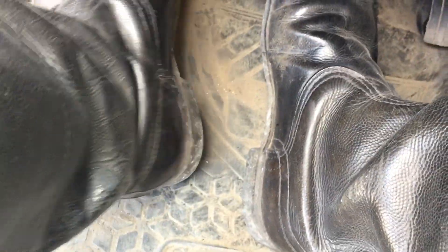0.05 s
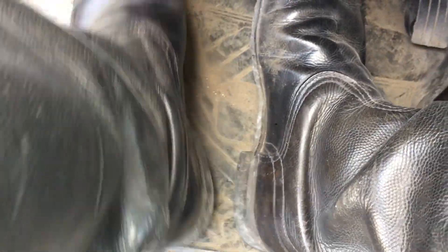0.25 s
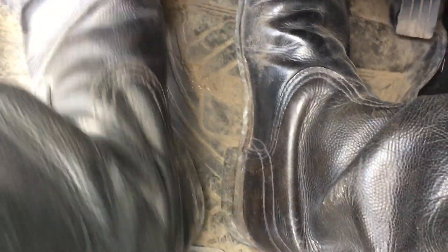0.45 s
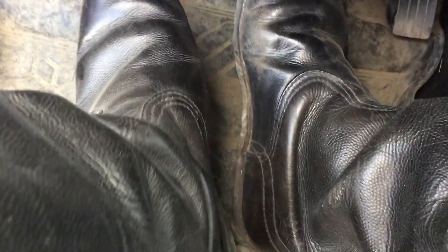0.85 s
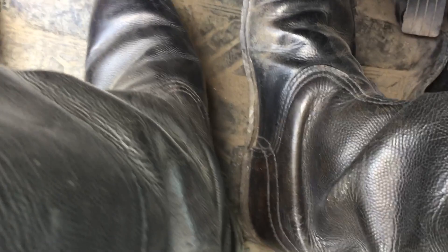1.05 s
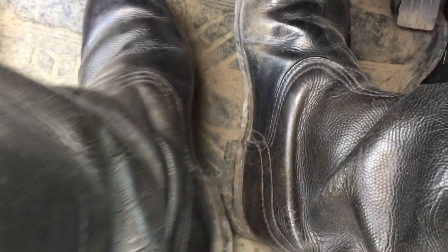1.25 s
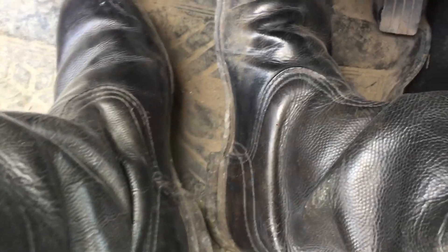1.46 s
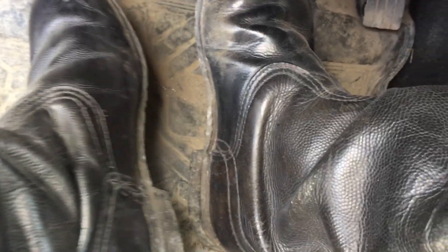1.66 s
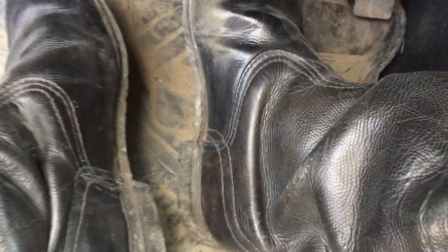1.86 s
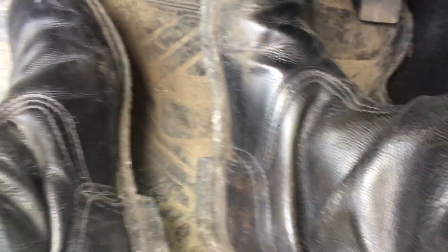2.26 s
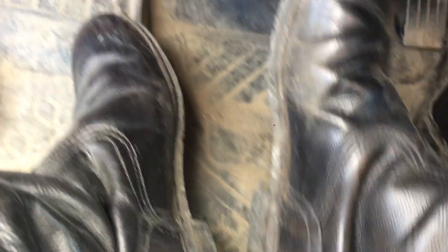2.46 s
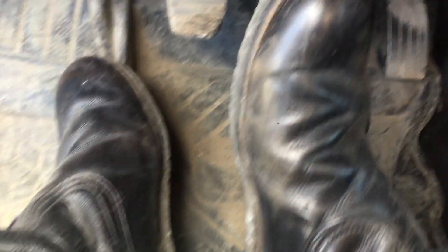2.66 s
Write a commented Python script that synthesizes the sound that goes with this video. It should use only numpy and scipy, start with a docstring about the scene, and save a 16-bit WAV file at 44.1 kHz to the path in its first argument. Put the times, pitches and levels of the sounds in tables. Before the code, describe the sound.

Leather boots shift on a gritty rubber floor mat inside a vehicle, heard up close. The soles scuff and knock over a low rumble, then the leather creaks in short bursts, ending with a click and a soft thump.

```python
"""Inside a vehicle, close to leather boots shifting on a gritty rubber floor mat.
The floor rumbles under the feet; the soles scuff, knock, rasp on the mat's ribs and judder as they grip.
Between scuffs the leather flexes and creaks in short separate slips, ending in one sharper click.
It also shakes a small metal part and chirps twice. The last step leaves a floor panel droning.
Two thin, high whistles sound among the creaks; one brief, very high, hissy tick comes near the end."""
import sys
import numpy as np
from scipy import signal
from scipy.fft import rfft, irfft, next_fast_len
from scipy.io import wavfile
from scipy.ndimage import uniform_filter1d

SR = 44100
rng = np.random.default_rng(int(sys.argv[2]) if len(sys.argv) > 2 else 0)


def digitize_waveform(pressure):
    """Quantize a signal to 16-bit integers and store it at the path in sys.argv[1].

    Rows of a 2-D input are taken as channels; values are limited to [-1, 1].
    """
    field = np.atleast_2d(pressure).T
    bounded = np.clip(field, -1, 1)
    quanta = np.round(bounded * 32767).astype(np.int16)
    wavfile.write(sys.argv[1], SR, quanta)


N = 123479
TIME_S = np.arange(N) / SR

# Spectra of cabin air, floor rumble, rubber rub and dust hiss.
# Each row: frequency in Hz, relative density in dB.
AIR_SPECTRUM = [(20, 0), (85, -8.5), (324, -7.5), (450, -11.5), (900, -20.5), (1500, -18.5),
                (1920, -22), (4300, -25), (10000, -34), (15500, -38)]
RUMBLE_SPECTRUM = [(20, -38.5), (35, -14), (50, 3), (68, 0), (125, -3.5), (170, -12), (300, -18.5),
                   (500, -34.5), (2500, -56)]
RUB_SPECTRUM = [(100, -8), (200, -1.5), (370, -4.5), (480, -14), (700, -11.5), (1000, -24), (1500, -20.5),
                (3000, -43)]
HISS_SPECTRUM = [(2000, -46), (4500, -3), (6200, -6), (7400, -7), (9000, 3), (10400, -4.5), (12000, -4.5),
                 (16000, -6.5)]
# Floor rumble envelope. Each row: time in seconds, level in dB.
RUMBLE_ENVELOPE = [(0, -36), (.03, -55.5), (.12, -64), (.18, -47.5), (.31, -35.5), (.39, -41), (.47, -54),
                   (.56, -60.5), (.66, -48.5), (.82, -46.5), (.89, -54), (.96, -46.5), (1.04, -49),
                   (1.13, -45.5), (1.32, -42), (1.38, -58), (1.47, -71), (1.52, -45.5), (1.6, -51),
                   (1.64, -60), (1.69, -48.5), (2.0, -48), (2.15, -49), (2.2, -57.5), (2.32, -40.5),
                   (2.55, -49.5), (2.8, -52)]
# Sole scuffs. Each row: peak time, rise and fall in seconds, then rub, grit and hiss levels in dB.
SOLE_SCUFFS = [(.139, 0.03, 0.043, -65, -60, -78), (0.17, 0.003, 0.02, -52.5, -59.5, -82),
               (0.328, 0.12, 0.15, -40.5, -46, -47.5), (.395, 0.035, 0.037, -47.5, -56.5, -75),
               (.519, 0.035, 0.014, -51, -51, -69), (.62, 0.11, 0.16, -61.5, -65.5, -74),
               (0.777, 0.044, 0.11, -47.5, -53.5, -65), (0.8147, 0.0045, 0.0044, -46, -47.5, -57),
               (0.832, 0.023, 0.028, -38, -49.5, -70), (2.345, 0.0049, 0.013, -61, -61, -71.5),
               (2.432, 0.018, 0.025, -53, -65, -83)]
# Resonances of sole and mat under grit, of the sole's edge, and of a metal part, perhaps a buckle.
# Each row: frequency in Hz, width in Hz, relative gain in dB.
GRIT_MODES = [(1002, 104, 10.5), (1450, 390, 3.5), (2340, 540, 7), (2840, 470, 7), (3470, 380, 3),
              (4150, 360, 2), (6040, 1000, -2), (9100, 720, -8)]
RASP_MODES = [(1430, 87, -9), (2490, 150, -4), (2800, 200, -2), (3400, 270, 3.5)]
METAL_MODES = [(4040, 300, -1.5), (7160, 90, -3.5), (7700, 95, -4), (11500, 170, -1), (12800, 77, 2.5),
               (14980, 200, -4)]
# Floor knocks and leather chirps. Each row: start in seconds, peak in dB, pitch in Hz, swell in seconds.
FLOOR_KNOCKS = [(.204, -32, 73.6, 0.021), (.246, -24.5, 65.3, 0.021), (.277, -20, 153.5, 0.0076),
                (.283, -24.5, 105, 0.0093), (.645, -43.5, 257, 0.0031), (.708, -36.5, 73, 0.011),
                (.821, -27, 200, 0.0053), (.8252, -18.5, 285, 0.0016), (1.123, -36, 126.5, 0.0063),
                (1.190, -30.5, 106, .005), (1.254, -27, 284, 0.0025), (1.256, -34, 122, 0.0073),
                (1.3355, -39.5, 857, 0.0022), (1.4105, -39.5, 525, 0.0022), (1.493, -57.5, 298, 0.0051),
                (1.683, -37.5, 146, 0.0054), (1.80, -35.5, 233, 0.0023), (1.962, -36.5, 64.7, 0.019),
                (2.062, -33, 154.2, 0.009), (2.094, -29.5, 62.5, 0.0061), (2.27, -38.5, 160, 0.0037),
                (2.345, -32, 101, 0.019), (2.35, -39.5, 510, 0.0049), (2.424, -30.5, 199, 0.0046),
                (2.426, -50.5, 480, 0.0047), (2.434, -21, 117.6, 0.01), (2.499, -32.5, 88, 0.0082),
                (2.534, -32, 61.5, 0.0099)]
LEATHER_CHIRPS = [(2.511, -56.5, 2700, 0.0026), (2.535, -55.5, 2810, 0.0013)]
# Edge rasps and metal tremors. Each row: peak time, rise and fall in seconds, level in dB.
EDGE_RASPS = [(.311, 0.0081, 0.0064, -52), (.34, 0.037, 0.049, -47.5), (0.518, 0.03, 0.012, -52),
              (.775, 0.032, 0.1, -56.5), (.844, .003, 0.0049, -52.5)]
METAL_TREMORS = [(1.86, 0.077, 0.028, -76), (1.915, 0.028, 0.025, -69), (1.968, 0.095, 0.054, -66)]
# Sole judders. Each row: peak time, rise and fall in seconds, level in dB, pitch in Hz.
SOLE_JUDDERS = [(.375, 0.083, 0.019, -47.5, 363), (0.408, 0.05, 0.021, -37, 553),
                (0.487, 0.0076, 0.011, -45.5, 400), (0.771, 0.012, 0.035, -40, 351),
                (2.354, 0.017, 0.029, -51.5, 466), (2.371, 0.028, 0.02, -34.5, 303.3),
                (2.43, 0.019, 0.029, -46.5, 370.4)]
# Leather slips. Each row: peak time in seconds, fall in ms, then body, middle, crack, edge drive in dB.
LEATHER_SLIPS = [(0.981, 9.1, -63, -59, -57, -65), (0.989, 7.2, -54, -57.5, -59, -64.5),
                 (1.029, 4.9, -52.5, -58, -66, -68), (1.0453, 2.3, -50, -58, -66, -64),
                 (1.0625, 3.1, -69, -50, -48.5, -51.5), (1.0796, 5.2, -54, -46, -51, -57),
                 (1.0975, 3.9, -53.5, -55, -47.5, -50), (1.1297, 7.7, -55, -50.5, -49.5, -53),
                 (1.191, 6.1, -43, -49.5, -47, -66), (1.229, 4.9, -64, -50.5, -51.5, -56),
                 (1.241, 3.4, -47.5, -50, -53, -70), (1.259, 12, -52, -53, -57.5, -60),
                 (1.274, 2.7, -43.5, -41.5, -41.5, -52), (1.3368, 3.1, -41.5, -45.5, -49.5, -68),
                 (1.379, 7.4, -51.5, -64, -62, -68), (1.412, 6.7, -45, -52, -49, -56),
                 (1.673, 14.7, -51.5, -56.5, -60.5, -61.5), (1.727, 6.8, -47.5, -62, -50, -54),
                 (1.762, 3.2, -47, -67, -48.5, -58), (1.788, 2.2, -50, -53, -51, -77),
                 (1.7981, 5.9, -45.5, -48, -50, -56), (1.8877, 2.9, -50.5, -69, -43.5, -70),
                 (2.256, 3, -53, -52, -51, -59)]
# Boot resonances, one list per register: body, middle, crack, edge.
# Each row: frequency in Hz, width in Hz, relative gain in dB.
LEATHER_MODES = [
    [(665, 106, 5), (767, 145, 0), (1036, 78, -3.5)],
    [(1148, 96, 2.5), (1524, 93, 7.5), (1740, 150, 3.5)],
    [(2104, 130, -1), (2623, 85, 5), (3190, 156, 0), (3690, 123, -2), (4180, 230, -2.5)],
    [(5316, 110, 4.5), (6280, 500, 1.5), (7430, 1800, -8.5), (9760, 230, -9), (11700, 2500, -20)],
]
# Two thin whistles and a hissy tick.
# Each row: peak time and rise or fall in seconds, level in dB, centre and width in Hz.
WHISTLES_AND_TICK = [(1.09, 0.087, -79, 12620, 33), (1.05, 0.074, -83, 15020, 60),
                     (2.43, .018, -61, 15000, 700)]
# Contacts of the click. Each row: start in seconds, level in dB.
CLICK_HITS = [(2.2671, -44), (2.2684, -35.5), (2.2696, -44)]
# Modes of the click. Each row: frequency in Hz, relative gain in dB, T60 in seconds.
CLICK_RING = [(630, 2, 0.014), (1270, 1, 0.0086), (1570, -14, 0.041), (2150, 0, 0.021), (2760, -8, 0.025),
              (4070, -1, 0.0026), (5600, -14.5, 0.015), (6940, -13, 0.0058), (8350, -17, 0.0066),
              (13400, -14, 0.002)]


def from_db(db):
    """Decibels to gain."""
    return 10 ** (np.asarray(db) / 20)


def unit_rms(x):
    """Scale to rms 1."""
    return x / np.sqrt(np.mean(x ** 2) + 1e-20)


def drift(rate_hz):
    """Slow random wander; rms 1."""
    r = np.exp(-2 * np.pi * rate_hz / SR)
    return unit_rms(signal.lfilter([1], [1, -2 * r, r * r], rng.standard_normal(N + SR))[SR:])


def colour(x, spectrum):
    """Minimum-phase filter that follows a spectrum; rms 1."""
    size = 2 * next_fast_len(N)
    hz, db = np.transpose(spectrum)
    grid_hz = np.maximum(np.arange(size // 2 + 1) * SR / size, 1)
    gain = from_db(np.interp(np.log(grid_hz), np.log(hz), db))
    cepstrum = irfft(np.log(gain))
    response = np.exp(rfft(2 * cepstrum[:size // 2], size))
    return unit_rms(irfft(rfft(x, size) * response)[:N])


def resonate(x, modes):
    """Parallel resonances of alternating sign that keep the power of white noise."""
    out, power = 0, 0
    for k, (hz, width_hz, db) in enumerate(modes):
        r = np.exp(-np.pi * width_hz / SR)
        gain = from_db(db) * (1 - r * r) / 2
        feedback = [1, -2 * r * np.cos(2 * np.pi * hz / SR), r * r]
        out = out + (-1) ** k * signal.lfilter([gain, 0, -gain], feedback, x + 1e-18)
        power += gain * from_db(db)
    return out / np.sqrt(power)


def notch(x, hz, q):
    """Cut one narrow band."""
    return signal.lfilter(*signal.iirnotch(hz, q, fs=SR), x)


def grains(per_s, spread_db=3):
    """Random tiny impacts of uneven size; rms 1."""
    sizes = from_db(spread_db * np.minimum(rng.exponential(1, N), 4)) * rng.choice([-1, 1], N)
    return unit_rms(sizes * (rng.random(N) < per_s / SR))


def stroke(peak_s, rise_s, fall_s):
    """Envelope: 1 at the peak, 20 dB down at rise_s before and fall_s after."""
    away = np.maximum((peak_s - TIME_S) / rise_s, (TIME_S - peak_s) / fall_s)
    return from_db(-20 * np.minimum(away, 10) ** 1.92)


def swell(start_s, swell_s):
    """Soft contact: rises to 1 in swell_s, then decays."""
    age = np.clip((TIME_S - start_s) / swell_s, 0, 20)
    return (age * np.exp(1 - age)) ** 2


def soft_rings(rows):
    """Damped tones set off by soft contacts."""
    return sum(from_db(db) * swell(start_s, swell_s) * np.sin(2 * np.pi * hz * (TIME_S - start_s))
               for start_s, db, hz, swell_s in rows)


def cabin_air(level_db=-63):
    """Steady, dark background noise."""
    return from_db(level_db) * colour(rng.standard_normal(N), AIR_SPECTRUM)


def floor_rumble():
    """The floor rumbles under the shifting feet."""
    noise = colour(rng.standard_normal(N), RUMBLE_SPECTRUM)
    levelled = noise / np.sqrt(uniform_filter1d(noise ** 2, size=2200) + 1e-6)
    return levelled * from_db(np.interp(TIME_S, *np.transpose(RUMBLE_ENVELOPE)))


def sole_scuffs(grains_per_s=5100, flutter_db=1.5):
    """Soles drag on the mat: dull rubber rub, rolling grit, dust hiss that grows fastest with speed."""
    speeds = np.array([stroke(*row[:3]) for row in SOLE_SCUFFS])
    rub_gain, grit_gain, hiss_gain = from_db(np.array(SOLE_SCUFFS)[:, 3:]).T
    rub = (rub_gain @ speeds) * colour(grains(grains_per_s), RUB_SPECTRUM)
    grit = (grit_gain @ speeds) * resonate(grains(grains_per_s), GRIT_MODES)
    grit = notch(grit, hz=1926, q=24)
    hiss = (hiss_gain @ speeds ** 2.13) * colour(grains(2 * grains_per_s), HISS_SPECTRUM)
    return (rub + grit + hiss) * from_db(flutter_db * drift(rate_hz=54))


def floor_knocks():
    """Soles knock softly; the floor rings briefly."""
    return soft_rings(FLOOR_KNOCKS)


def edge_rasps():
    """The sole's edge catches on the mat's ribs: a narrow, dry rasp of coarse grains."""
    pressure = sum(from_db(db) * stroke(*timing_s) for *timing_s, db in EDGE_RASPS)
    return resonate(pressure * grains(per_s=1000), RASP_MODES)


def sole_judders(grabs_per_s=95, depth=0.79, wander=0.1304):
    """Rubber grabs and lets go at an unsteady rate, shaking the sole."""
    unsteady_s = np.cumsum(1 + wander * drift(rate_hz=108.5)) / SR
    shaking = sum(from_db(db) * stroke(*timing_s) * np.sin(2 * np.pi * hz * unsteady_s)
                  for *timing_s, db, hz in SOLE_JUDDERS)
    return shaking * (1 + depth * np.sin(2 * np.pi * grabs_per_s * unsteady_s))


def leather_creaks(creep_db=-21, tail_db=-18.5, jerk_over_friction_db=3, gain_db=-0.5):
    """Each slip rings the leather with micro-slips and one jerk; faint creep before, a tail after."""
    drives = np.zeros((len(LEATHER_MODES), N))
    friction = grains(per_s=8200)
    for peak_s, fall_ms, *registers_db in LEATHER_SLIPS:
        fall_s = fall_ms / 1000
        creep = from_db(creep_db) * stroke(peak_s, rise_s=0.049, fall_s=fall_s)
        tail = from_db(tail_db) * swell(peak_s, swell_s=0.011)
        envelope = creep + stroke(peak_s, 0.96 * fall_s, fall_s) + tail
        burst = envelope * friction
        burst[int(peak_s * SR)] += from_db(jerk_over_friction_db) * np.sqrt(np.sum(burst ** 2))
        burst *= np.sqrt(np.sum(envelope ** 2) / (np.sum(burst ** 2) + 1e-12))  # envelope sets energy
        drives += from_db(registers_db)[:, None] * burst
    ringing = sum(resonate(drive, modes) for drive, modes in zip(drives, LEATHER_MODES))
    return from_db(gain_db) * notch(ringing, hz=1960, q=25)


def whistles_and_tick(noise):
    """Two thin, high whistles and one brief, very high, hissy tick."""
    return sum(resonate(noise * from_db(db) * stroke(peak_s, span_s, span_s), [(hz, width_hz, 0)])
               for peak_s, span_s, db, hz, width_hz in WHISTLES_AND_TICK)


def metal_ringing(noise):
    """Flexing leather keeps a small metal part faintly ringing."""
    shaking = sum(from_db(db) * stroke(*timing_s) for *timing_s, db in METAL_TREMORS)
    return resonate(noise * shaking, METAL_MODES)


def click():
    """A hard edge snaps over in three quick contacts."""
    out = np.zeros(N)
    for start_s, hit_db in CLICK_HITS:
        age_s = np.clip(TIME_S - start_s, 0, 1)
        for hz, mode_db, t60_s in CLICK_RING:
            decay_db = np.minimum(60 * age_s / t60_s, 200)
            out += from_db(hit_db + mode_db - decay_db) * np.sin(2 * np.pi * hz * age_s)
    return out


def panel_drone(start_s=2.4, pitch_hz=106.45, level_db=-43, t60_s=6.5, flutter_db=0.5):
    """A floor panel rings on after the last step."""
    age_s = np.maximum(TIME_S - start_s, 0)
    envelope = from_db(level_db + flutter_db * drift(rate_hz=14) - 60 * age_s / t60_s)
    return envelope * np.sin(2 * np.pi * pitch_hz * age_s)


def leather_chirps():
    """Flexing leather gives two tiny squeaks."""
    return soft_rings(LEATHER_CHIRPS)


def scene():
    """Boots and floor over quiet cabin air; mono."""
    floor = floor_rumble() + floor_knocks() + panel_drone()
    soles = sole_scuffs() + edge_rasps() + sole_judders()
    noise = rng.standard_normal(N) * from_db(3.5 * drift(rate_hz=40))  # 3.5 dB flutter
    treble = whistles_and_tick(noise) + metal_ringing(noise)
    leather = leather_creaks() + leather_chirps()
    return (cabin_air() + floor + soles + leather + treble + click())[None]


def record(dry):
    """Steep elliptic low-pass."""
    cutoff_hz = 15850
    return signal.sosfilt(signal.ellip(12, .1, 80, cutoff_hz, fs=SR, output="sos"), dry)


dry = scene()
out = record(dry)
digitize_waveform(out)
```